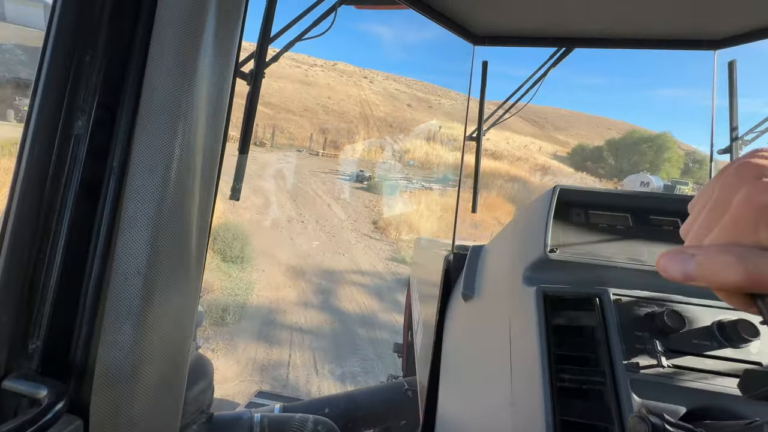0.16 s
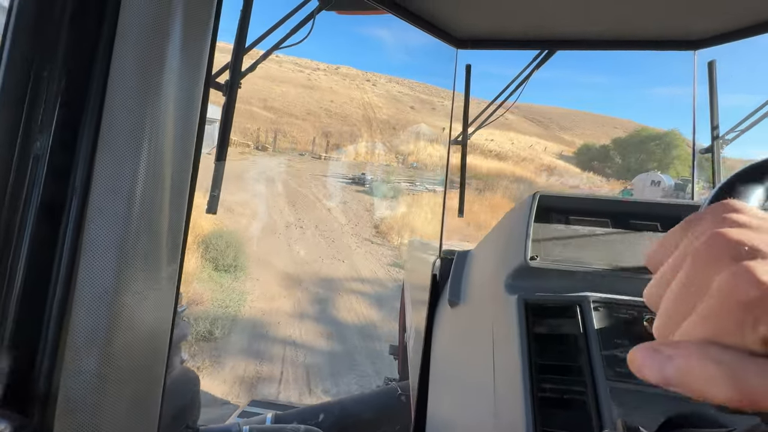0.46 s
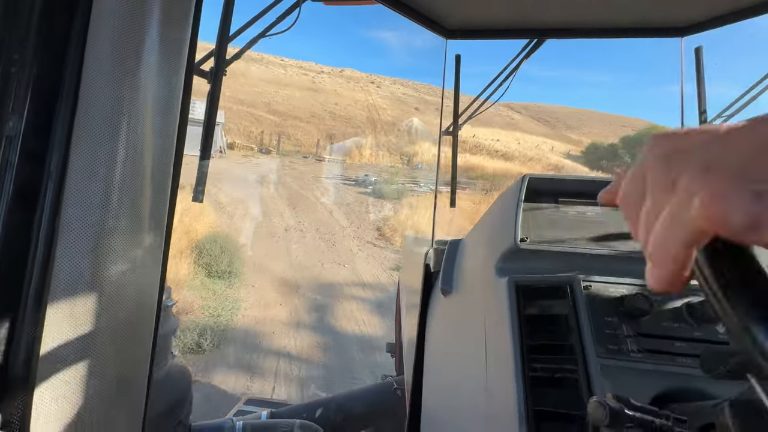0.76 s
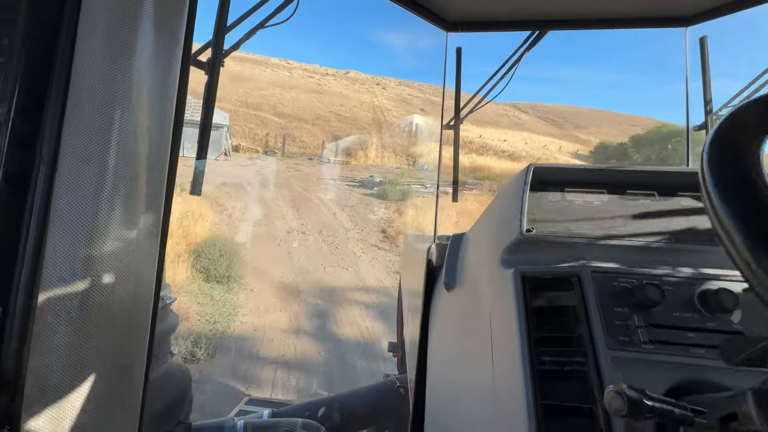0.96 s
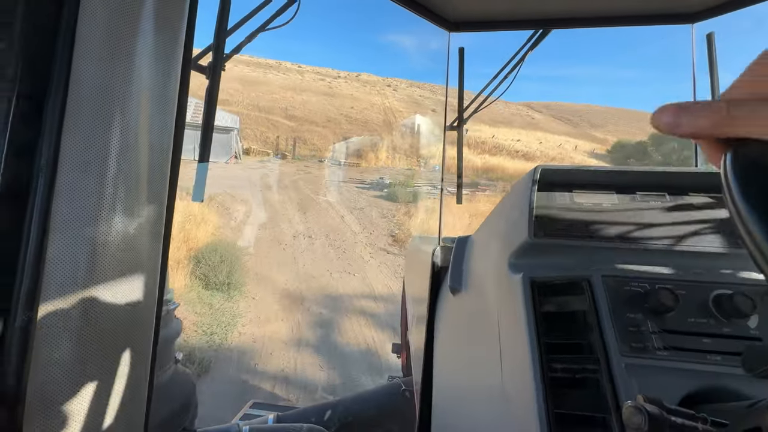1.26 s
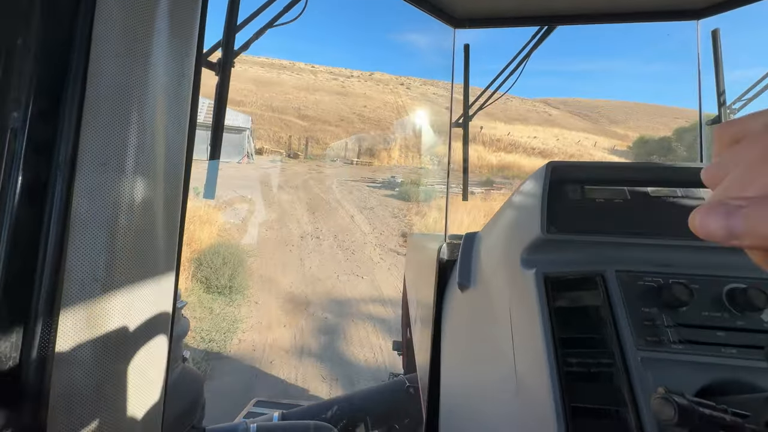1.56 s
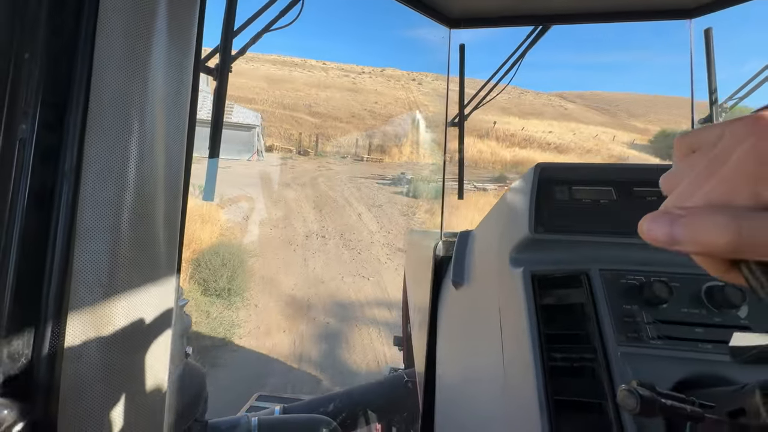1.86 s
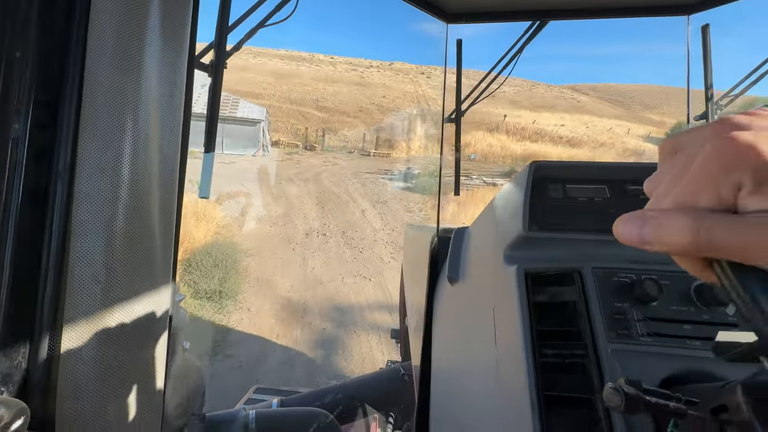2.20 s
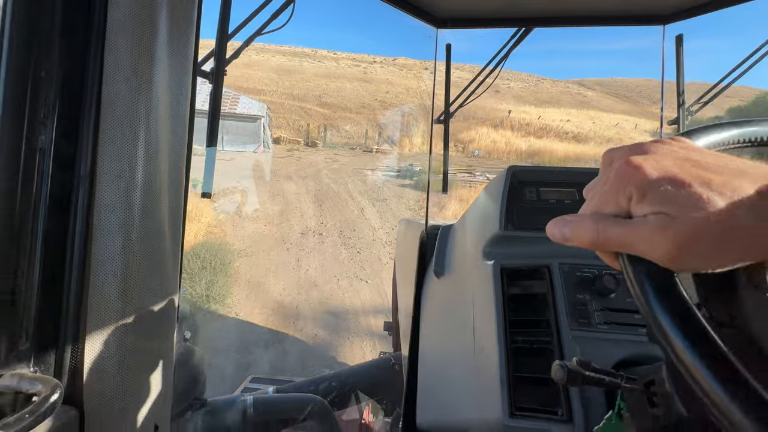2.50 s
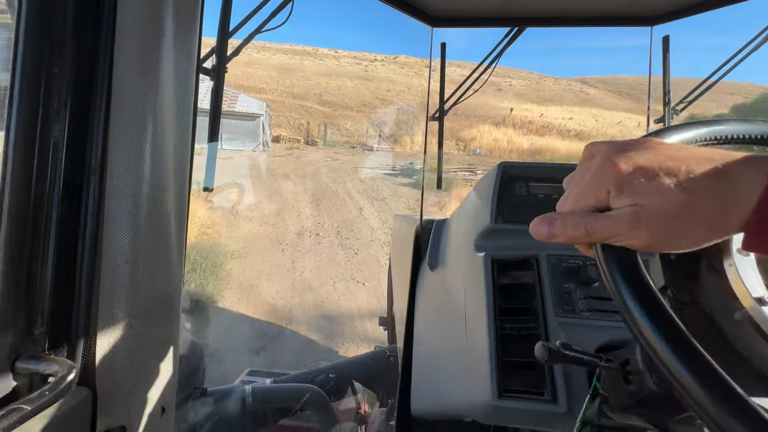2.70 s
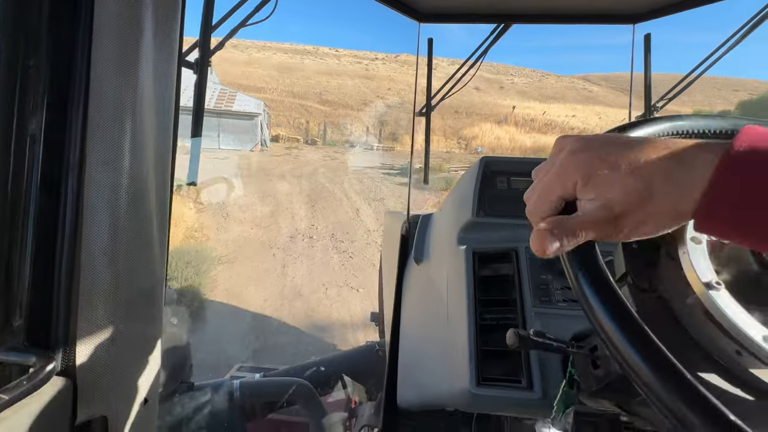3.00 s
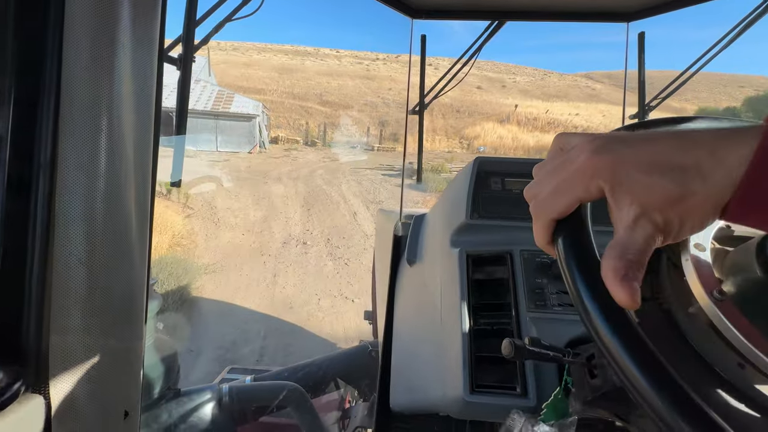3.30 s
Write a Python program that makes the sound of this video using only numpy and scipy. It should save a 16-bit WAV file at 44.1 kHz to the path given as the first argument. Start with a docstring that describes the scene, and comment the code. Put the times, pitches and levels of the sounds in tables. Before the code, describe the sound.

A large tractor diesel holds a deep, almost unchanging boom around 92 hertz, heard inside the small cab with muffled roar, faint pump whine, mechanical clatter and soft fan hiss. Low floor rumble surges irregularly, strongest near 2.8 s. Brief dry trim rattles appear from 1.4 s, with a clear little metal clink at 2.4 s. The engine then pulls slightly harder; a last rattle ticks near 3.4 s.

```python
"""Inside the cab of a large tractor on a dirt track, 3.45 s. From the start the six-cylinder diesel, firing about
92 times a second, booms as a harmonic series of cycle orders; pumps whine as sines, and roar and fan air are
shaped noise. The track rumbles in the floor as low noise in surges. From 1.4 s loose trim rattles as ticking
noise and a metal part clinks as decaying modes. From 2.35 s the engine pulls harder and some orders grow; the
strongest clink follows near 2.42 s, the strongest surge of rumble near 2.83 s, the last rattle near 3.36 s."""
import sys
import numpy as np
from scipy import signal
from scipy.fft import rfft, irfft, next_fast_len
from scipy.io import wavfile

SR = 44100
rng = np.random.default_rng(int(sys.argv[2]) if len(sys.argv) > 2 else 0)


def inscribe(sig):
    """Save sig as 16-bit PCM at rate SR to the path in sys.argv[1].

    A 1-D sig is mono; a 2-D sig holds one channel per row.
    Samples are clipped to [-1, 1] before scaling.
    """
    pcm = np.round(np.clip(np.atleast_2d(sig).T, -1, 1) * 32767)
    wavfile.write(sys.argv[1], SR, pcm.astype(np.int16))


N = 152145  # samples
CYLINDERS = 6  # firings per engine cycle

# engine speed: t/s, firing rate f/Hz
FIRING_RATE = [(0, 92.3), (.4, 92.42), (.75, 92.5), (1.0, 92.85), (1.25, 92.7), (1.6, 92.18), (2.0, 92.48),
               (2.4, 92.35), (2.8, 91.85), (3.05, 91.9), (3.45, 92.4)]
# base level of the roar in three ranges: t/s, low level/dB, middle level/dB, high level/dB
ROAR_LEVELS = [(0, -33.5, -38, -39.5), (.5, -35.5, -35.5, -39), (1, -34, -37.5, -39.5),
               (1.5, -34.5, -35.5, -38.5), (2, -35, -34.5, -38), (2.5, -33, -36, -37),
               (2.9, -32.5, -35, -35.5), (3.45, -33, -37.5, -35.5)]
# edges between those ranges: f/Hz
ROAR_EDGES_HZ = (430, 950)
# spectral density of the engine noise: f/Hz, relative level per hertz/dB
ENGINE_NOISE_SHAPE = [(60, -53), (100, 5.5), (150, 1.5), (175, -3.5), (230, -1), (310, -2), (400, -13),
                      (550, -14.5), (790, -18.5), (1000, -21.5), (1200, -18.5), (1350, -24), (1600, -27),
                      (2100, -30.5), (2700, -39), (4000, -44.5), (6000, -59.5)]
# left-right balance of the noise: f/Hz, level difference/dB
SIDE_BALANCE = [(60, 2), (200, -3.5), (350, -1.5), (600, 2), (1300, 3.5), (2000, -1.5), (3400, 6),
                (4000, 2), (6000, 7.5), (7400, 11), (8300, -2.5), (9300, -5.5), (10800, 1), (15000, -0.5)]


def from_db(db):
    """Amplitude ratio from a logarithmic level."""
    return 10 ** (np.asarray(db) / 20)


def rms_one(x):
    """Normalize the mean power to one."""
    return x / np.sqrt(np.mean(x ** 2) + 1e-20)


def in_time(rows):
    """Linear interpolation of a two-column time curve, one value per sample."""
    return np.interp(np.arange(N) / SR, *np.transpose(rows))


def at_hz(points, hz):
    """Linear interpolation of a spectrum on a log-frequency axis."""
    table = np.array(points)
    return np.interp(np.log(hz + 1), np.log(table[:, 0]), table[:, 1])


def drift(rate):
    """Random wander: noise through a two-pole low-pass with its poles at rate/Hz, spread 1."""
    step = 40  # samples between computed points
    pole = np.exp(-2 * np.pi * rate * step / SR)
    white = rng.standard_normal(N // step + 2002)
    slow = signal.lfilter([1], [1, -2 * pole, pole * pole], white)[2000:]  # drop the settling
    return np.interp(np.arange(N) / step, np.arange(len(slow)), rms_one(slow - slow.mean()))


def pan(db):
    """Interaural level difference as a pair of left and right gains."""
    return from_db([[db / 2], [-db / 2]])


def tone(phase, level_db, pan_db, lead):
    """Pure tone of given rms level; level and phase differences (left leads, rad) place it."""
    side_phase = np.array([[lead / 2], [-lead / 2]])
    return np.sqrt(2) * from_db(level_db) * pan(pan_db) * np.sin(phase + side_phase)


def pair_noise(gain_at):
    """Partial coherence at a microphone pair: common plus independent noise, colored, rms 1."""
    # f/Hz, share of the power common to both sides (0-1)
    coherence = [(70, .99), (150, .95), (300, .6), (1600, .5), (2200, .28), (9000, .25), (10800, .85),
                 (15000, .85)]
    left_lag_s = .000357  # delay of the common part on the left
    size = next_fast_len(N)
    hz = np.arange(size // 2 + 1) * SR / size
    common, left, right = rfft(rng.standard_normal((3, size)))
    share = np.clip(at_hz(coherence, hz), 0, 1)
    tilt = from_db(at_hz(SIDE_BALANCE, hz) / 2)
    delayed = common * np.exp(-2j * np.pi * hz * left_lag_s)
    left = tilt * (np.sqrt(share) * delayed + np.sqrt(1 - share) * left)
    right = (np.sqrt(share) * common + np.sqrt(1 - share) * right) / tilt
    return rms_one(irfft(gain_at(hz) * np.array([left, right]), size)[:, :N])


def roar_level(column):
    """Time-varying level of one range of the roar, dB."""
    return in_time(np.array(ROAR_LEVELS)[:, [0, column]])


def swing(column):
    """Level modulation of one range of the roar about its mean, dB."""
    level = roar_level(column)
    return level - level.mean()


def engine(cycle):
    """Harmonic series of a periodic source: orders of the engine cycle, led by the firing tone."""
    # multiple of the cycle rate, base level/dB, left-right level/dB, left lead/rad
    orders = [(4.0, -42.5, 1.7, -0.02), (6.0, -18.3, 3.9, -0.2), (10.0, -47.6, 7.3, 0.41),
              (14.0, -47.7, 5.2, 0.42), (15.0, -46.5, -4.2, -0.16), (17.0, -51.5, 2.0, -0.88),
              (20.0, -49, 3, 0.5), (24, -56, -5, .3), (26.0, -51.4, -4.7, -0.91), (30.0, -49.5, 9, -3),
              (32.0, -50.4, -7.9, 2.35), (33.0, -45.8, 9.3, -0.14), (34.0, -45.5, 3.4, -1.09),
              (35.0, -51.0, -0.5, -0.67), (39.0, -44.8, 2.1, 0.84), (41.0, -54.4, 4.7, 0.33),
              (45.0, -49.5, -7.1, -1.38), (46.0, -49.9, 6.1, -2.86), (48.0, -54.8, -3.3, 2.48),
              (54, -57, -6, 1.1), (57.0, -45.6, -0.8, -0.12), (58.0, -51.7, 3.9, -0.28),
              (60.0, -56, 10.0, 1.4), (66, -61, 5, .2), (70.0, -57.2, 3.4, -1.5), (75.0, -59, 7.3, 2.5)]
    # load on the firing tone: t/s, gain level/dB
    load = [(0, 0), (.5, -.5), (1, -0.3), (1.5, -0.6), (2, 1), (2.5, 0.7), (2.9, 0), (3.45, 2)]
    # harder pull: t/s, share (0-1)
    pull = [(2.35, 0), (2.9, 1)]
    # growth under the full pull, by multiple: gain level/dB
    pull_gain = {20: 7, 24: 10, 30: 8, 33: 4, 60: 6, 66: 10, 75: 15}
    boom_waver_db, order_waver_db, order_wander_rad = .18, 1.1, .17  # spreads
    side_orders_db = .5  # gain on all orders but the firing tone
    out = 0
    for multiple, level_db, pan_db, lead in orders:
        multiple = round(multiple)
        if multiple == CYLINDERS:  # firing tone: phase locked to the cycle
            phase = 0
            gain_db = in_time(load) + boom_waver_db * drift(2.6)
        else:
            # every third order starts in step with the firings, the rest anywhere
            start = rng.uniform(0, 2 * np.pi) if multiple % 3 else 0
            phase = start + order_wander_rad * drift(3.0)
            growth_db = pull_gain.get(multiple, 0) * in_time(pull)
            gain_db = side_orders_db + growth_db + order_waver_db * drift(2.6)
        out = out + tone(multiple * cycle + phase, level_db + gain_db, pan_db, lead)
    return out


def roar(cycle):
    """Amplitude-modulated broadband noise: three ranges with own level curves, the upper two knock per firing."""
    knock_depth = .13  # 0-1
    low_hz, high_hz = ROAR_EDGES_HZ

    def under(f, edge):
        return 1 / (1 + (f / edge) ** 8)

    # power shares of the ranges
    shares = (lambda f: under(f, low_hz),
              lambda f: under(f, high_hz) - under(f, low_hz),
              lambda f: 1 - under(f, high_hz))
    knock = 1 + knock_depth * np.cos(CYLINDERS * cycle)
    out = 0
    for k, share in enumerate(shares):
        noise = pair_noise(lambda f: from_db(at_hz(ENGINE_NOISE_SHAPE, f)) * np.sqrt(share(f)))
        gain = from_db(roar_level(k + 1) + .4 * drift(8.0))
        out = out + gain * noise * (knock if k else 1)
    return out


def whines():
    """Pure tones of pumps or gears, free of the cycle, wavering and following the low roar in level."""
    # f/Hz, base level/dB, left-right level/dB, left lead/rad, waver spread level/dB
    whine_tones = [(133.6, -36.5, .4, -.2, 1), (350.4, -40.5, -10, -1.3, 1.5), (215, -49.5, 3.5, .2, 2.5)]
    out = 0
    for hz, db, pan_db, lead, waver_db in whine_tones:
        phase = 2 * np.pi * hz * np.arange(N) / SR + rng.uniform(0, 6) + .5 * drift(2.5)
        level_db = db + swing(column=1) + waver_db * drift(4.0)
        out = out + tone(phase, level_db, pan_db, lead)
    return out


def panels(cycle):
    """Resonance of cab panels: narrow noise bands swell once per engine cycle and vary with the roar level."""
    # f/Hz, width between -6 dB points f/Hz, level before the swell/dB, left-right level/dB,
    # dB gained per dB of roar swing
    resonances = [(300, 97, -45.5, 1.5, 4.5), (885, 28, -46, -3, 1.5), (1463, 43, -55, 6, 1),
                  (1742, 35, -54, 4, -0.3), (2016, 78, -62.5, 3, 6)]
    throb_depth = .7  # 0-1
    out = 0
    for hz, width_hz, db, pan_db, follows in resonances:
        band = pair_noise(lambda f: 1 / (1 + (2 * (f - hz) / width_hz) ** 2))
        column = int(1 + np.searchsorted(ROAR_EDGES_HZ, hz))  # roar range holding this resonance
        gain = from_db(db + follows * swing(column)) * pan(pan_db)
        throb = 1 + throb_depth * np.sin(cycle + rng.uniform(0, 4.9))
        out = out + gain * band * throb
    return out


def clatter(cycle):
    """Periodic noise has a line spectrum: one valve and injector pattern per side repeats every cycle."""
    # first order, order after the last
    order_range = (61, 250)
    level_db, scatter_db = -50.5, 1.5  # rms level before the swing, spread among the orders
    points = 4096  # per cycle
    orders = np.arange(*order_range)
    hz = orders * FIRING_RATE[0][1] / CYLINDERS
    line_db = at_hz(ENGINE_NOISE_SHAPE, hz) + scatter_db * rng.standard_normal(len(orders))
    sides = pan(at_hz(SIDE_BALANCE, hz))[:, 0]
    random_phase = np.exp(2j * np.pi * rng.random((2, len(orders))))
    lines = np.zeros((2, points // 2 + 1), complex)
    lines[:, orders] = from_db(line_db) * sides * random_phase
    position = (cycle + .02 * drift(4.0)) / (2 * np.pi) % 1 * points
    out = [np.interp(position, np.arange(points), side, period=points) for side in irfft(lines)]
    return from_db(level_db + swing(column=3)) * rms_one(np.array(out))


def clinks():
    """Modal ringing: a few touches strike every decaying mode of a small metal part, each at its own strength."""
    # t/s, strike level/dB
    strikes = [(1.436, -50), (2.061, -45), (2.4165, -31)]
    # f/Hz, relative level/dB, 60 dB decay t/s
    modes = [(3700, -23, .14), (7020, -12, .05), (7154, -10, .075), (7386, -20, .17), (7500, -20, .2),
             (7784, -17, .08), (8861, -25, .04), (11400, -24, .06), (14260, -26, .03)]
    # delay of each touch after the strike: t/s
    touches = (0, .003, .014, .030)
    loss_db_per_s, pan_db = 330, 10  # later touches are weaker; left is louder
    out = np.full(N, 1e-18)
    for hz, level_db, t60 in modes:
        hits = np.full(N, 1e-18)  # tiny offset instead of zero
        for s, db in strikes:
            for late in touches:
                hit_db = db + level_db - loss_db_per_s * late + rng.normal(0, 2)
                at = int((s + late + rng.uniform(0, .001)) * SR)
                hits[at] = from_db(hit_db) * rng.choice([-1, 1])
        decay, w = from_db(-60 / (t60 * SR)), 2 * np.pi * hz / SR
        out += signal.lfilter([0, np.sin(w)], [1, -2 * decay * np.cos(w), decay ** 2], hits)
    return pan(pan_db) * out


def rattles():
    """Impulsive modulation: uneven ticks gate resonance-colored noise of loose trim; sharp start, quick fade."""
    # t/s, base level/dB, hold t/s, bright center f/Hz, dull knock level/dB, left-right level/dB
    bursts = [(1.397, -51, .006, 10500, 8, -2), (1.428, -55.5, 0.074, 9400, -15, 2),
              (1.83, -57, .006, 10300, -6, -2), (1.895, -50.5, 0.012, 9700, -12, 1),
              (2.416, -54, .012, 9400, -6, -2), (2.804, -52, .014, 9600, -2, -2),
              (2.86, -49.5, .016, 10700, 7, -5), (3.362, -49.5, 0.018, 11000, 1, -1)]
    octaves, dull_hz, snap_db = .24, 6000, -10  # bright hump's width; snap: treble above its center
    rise_s, fade_s, ticks_per_s = .0009, .011, 2500
    t = np.arange(N) / SR
    tick_gain = from_db(3 * np.minimum(rng.exponential(1, N), 3))
    ticks = (rng.random(N) < ticks_per_s / SR) * tick_gain
    grain = .5 + rms_one(signal.lfilter([1], [1, -.95], ticks))  # each tick dies away

    def hump(f, hz, width):
        return np.exp(-(np.log2((f + 1) / hz) / width) ** 2)

    out = 0
    for s, db, length, hz, dull_db, pan_db in bursts:
        def color(f):
            snap = from_db(snap_db) * (f > hz)
            dull = from_db(dull_db) * hump(f, dull_hz, 2 * octaves)
            return hump(f, hz, octaves) + snap + dull

        rise = np.clip((t - s) / rise_s, 0, 1)
        fade = np.exp(-np.clip(t - s - length, 0, 1) / fade_s)
        out = out + from_db(db) * pan(pan_db) * rise * fade * pair_noise(color)
    return out * rms_one(grain)


def track_rumble():
    """Structure-borne noise: the track shakes the floor in low-frequency surges."""
    # t/s, rms level/dB
    surges = [(0, -45), (.15, -26), (.35, -34), (.67, -30), (1.0, -39), (1.2, -41), (1.35, -30),
              (1.8, -31.5), (2.05, -30), (2.2, -24), (2.45, -30.5), (2.65, -31.5), (2.83, -18.5),
              (3.08, -41), (3.25, -27), (3.45, -43)]
    # f/Hz, relative level per hertz/dB
    floor_shape = [(15, -19), (25, -29), (38, 8), (48, 2.5), (57, 12.5), (65, 9), (75, -24), (90, -44)]
    noise = pair_noise(lambda f: from_db(at_hz(floor_shape, f)) * (f < 120))
    return from_db(in_time(surges)) * noise


def fan_air():
    """Flow noise: the hiss of fan air is high-frequency noise that drifts slowly in level."""
    # t/s, base level/dB
    flow = [(0, -55), (1, -52.5), (1.5, -51.5), (2, -53), (2.5, -52.5), (3, -53.5), (3.45, -54.5)]
    # f/Hz, relative level per hertz/dB
    hiss_shape = [(2500, -1.5), (3400, -1.5), (4100, -4), (5500, -5.5), (7600, -8), (9000, -10.5),
                  (10300, -9), (11200, -13.5), (13500, -21), (15200, -21)]
    noise = pair_noise(lambda f: from_db(at_hz(hiss_shape, f)) * np.clip(f / 2500, 0, 1) ** 4)
    return from_db(in_time(flow) + 1.07 * drift(1.1)) * noise


def cab(x):
    """Standing waves of the small cab color the upper noise unevenly: a random ripple over frequency."""
    depth_db, knot_hz, from_hz = 3, 25.18, 1200  # spread at the knots, knot spacing, onset
    size = next_fast_len(N)
    hz = np.arange(size // 2 + 1) * SR / size
    knots = np.arange(0, SR / 2 + 200, knot_hz)
    onset = np.clip(hz / from_hz - 1, 0, 1)  # complete an octave above from_hz
    ripple = np.interp(hz, knots, rng.standard_normal(len(knots))) * onset
    return irfft(rfft(x, size) * from_db(depth_db * ripple), size)[:, :N]


def scene():
    """Linear superposition of all sources; the engine's parts share the phase of its cycle."""
    cycle = 2 * np.pi * np.cumsum(in_time(FIRING_RATE)) / SR / CYLINDERS
    machine = engine(cycle) + whines() + panels(cycle) + clatter(cycle)
    upper_noise = cab(roar(cycle) + fan_air())
    return machine + upper_noise + clinks() + rattles() + track_rumble()


def record(dry):
    """Band limitation: a steep elliptic low-pass cuts the top."""
    low_pass = signal.ellip(10, .5, 70, 15600, fs=SR, output="sos")  # order, ripple/dB, stop/dB, edge f/Hz
    return signal.sosfilt(low_pass, dry)


dry = scene()
out = record(dry)
inscribe(out)
```